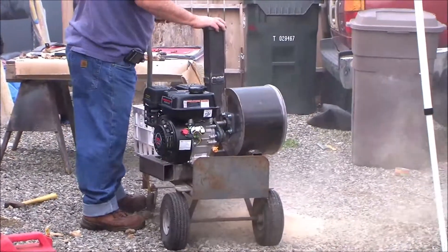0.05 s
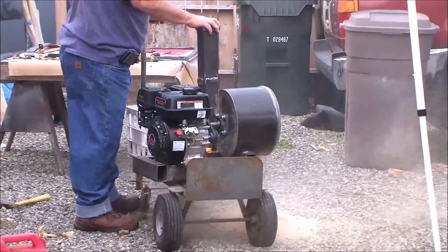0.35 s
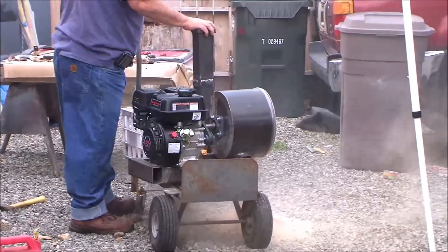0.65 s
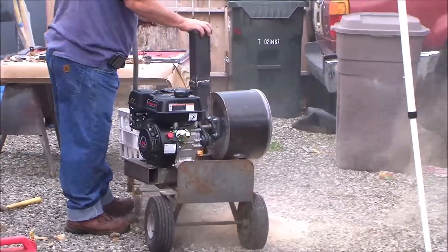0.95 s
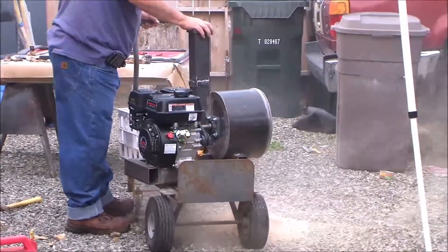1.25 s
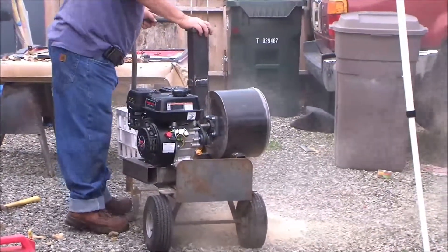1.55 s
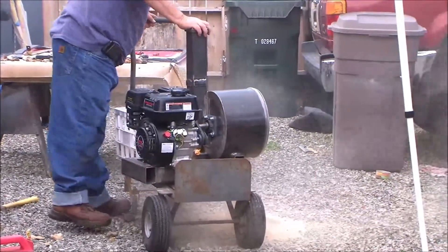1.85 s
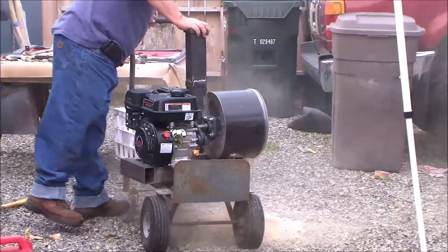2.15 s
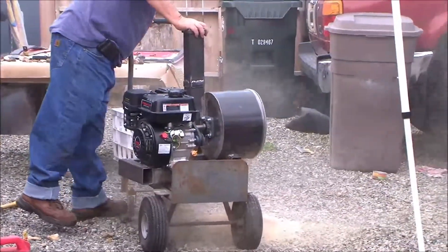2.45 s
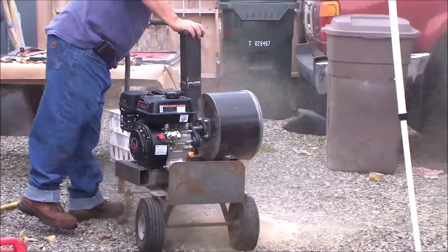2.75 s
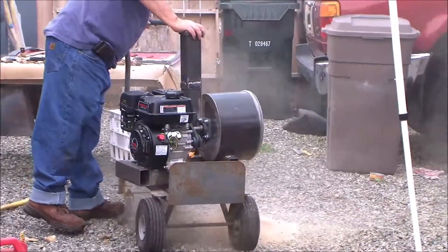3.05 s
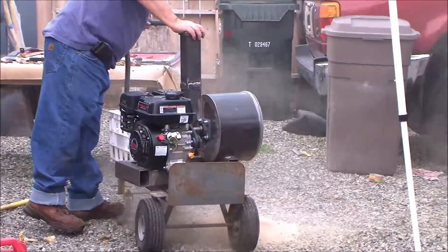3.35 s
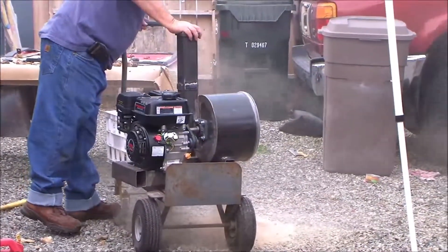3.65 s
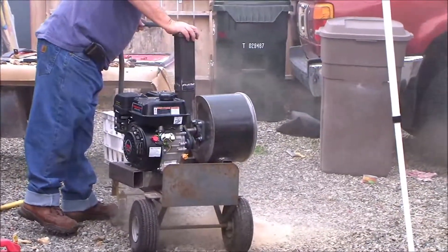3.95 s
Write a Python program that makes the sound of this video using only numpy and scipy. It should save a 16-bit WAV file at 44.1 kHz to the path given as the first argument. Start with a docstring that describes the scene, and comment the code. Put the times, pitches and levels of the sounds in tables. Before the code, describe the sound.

Rock clatters and cracks inside a steel crusher drum, then gives way to puttering engine noise.

```python
"""A gravel yard with a small flail rock crusher, driven by a one-cylinder four-stroke engine.
Three flails fling rock round a ringing steel drum; stones split and burst into hissing grit.
At about 2.7 s the drum runs empty: dust is swept round, a last pebble is knocked about
once a turn, and the engine's exhaust putter and mechanical clatter come forward."""
import sys
import numpy as np
from scipy import signal
from scipy.fft import rfft, irfft
from scipy.io import wavfile
from scipy.ndimage import uniform_filter1d

SR = 44100
rng = np.random.default_rng(int(sys.argv[2]) if len(sys.argv) > 2 else 0)


def store_pcm(level_fs):
    """Save levels as 16-bit WAV."""
    pcm = np.round(np.clip(level_fs, -1, 1) * 32767).astype(np.int16)
    wavfile.write(sys.argv[1], SR, np.atleast_2d(pcm).T)


N = 176400
RING_SAMPLES = 11025


def undb(db):
    """Decibels to gain."""
    return 10 ** (np.asarray(db) / 20)


def unit(x):
    """Scale to rms 1."""
    return x / np.sqrt(np.mean(x ** 2))


def curve(rows):
    """Interpolate (time_s, value) rows per sample."""
    time_s, values = np.array(rows).T
    return np.interp(np.arange(N) / SR, time_s, values)


def spectrum(points, hz):
    """Gain at hz from (freq_hz, gain_db) points."""
    freq_hz, gain_db = np.array(points).T
    return undb(np.interp(np.log(hz + 1), np.log(freq_hz), gain_db))


def colour(x, points, size=8192):
    """Minimum-phase filter through (freq_hz, gain_db) points."""
    cepstrum = irfft(np.log(spectrum(points, np.fft.rfftfreq(size, 1 / SR))))
    cepstrum[1:size // 2] *= 2
    cepstrum[size // 2 + 1:] = 0
    response = irfft(np.exp(rfft(cepstrum)))
    return signal.fftconvolve(x, response[None], axes=-1)[:, :x.shape[-1]]


def cut(x, hz, kind, order=2):
    """Butterworth low-pass or high-pass."""
    return signal.sosfilt(signal.butter(order, hz, kind, fs=SR, output="sos"), x)


def excite(force, response):
    """Drive a mid/side response with an impact train."""
    return signal.fftconvolve(force[None], response, axes=-1)[:, :N]


def fade(t60_s):
    """Exponential decay, 60 dB in t60_s."""
    return np.exp(-np.log(1000) * np.arange(RING_SAMPLES) / SR / t60_s)


def impacts(rate_hz, spread_db, cap=3):
    """Random impacts, a few much harder than the rest."""
    hit = rng.random(N) < rate_hz / SR
    hardness = np.minimum(rng.exponential(size=N), cap)
    return hit * rng.choice([-1, 1], N) * undb(spread_db * hardness)


def even(x, size=3000):
    """Hold the running rms at 1; single hits survive."""
    return x / np.sqrt(uniform_filter1d(np.mean(x ** 2, axis=0), size) + 1e-9)


def rotor_phase(per_turn=1, rotor_hz=23.08, flail_pass_s=2.7345):
    """Phase 0-1, wrapping per_turn times a revolution."""
    return ((np.arange(N) / SR - flail_pass_s) * rotor_hz * per_turn) % 1


def spray(gate, tone):
    """Dense ticks of small particles on steel."""
    decay = fade(0.027) + 0.34 * fade(0.06)
    ticks = 0
    for _ in range(5):
        force = impacts(rate_hz=550, spread_db=5, cap=2) * gate
        ticks += excite(force, rng.standard_normal((2, RING_SAMPLES)) * decay)
    return even(colour(ticks, tone))


def drum_response(t60_s=0.16, crack_s=0.0029, spread_db=2.5, detune_hz=3.75):
    """One random spot on the steel drum: dense ringing, a crack and its own mix of modes."""
    # drum modes: freq_hz, gain_db, t60_s
    drum_modes = [(549.8, -3, .14), (622, -11.5, 0.13), (1092, -9, 0.12), (1147, -6, 0.097),
                  (1466, -6.5, 0.17), (2040, -1, .17), (2242, -6, 0.12), (2598, -5, 0.17), (2786, -4, 0.16),
                  (2929, -5.5, 0.16), (3076, -6, 0.16), (3437, -3, 0.16), (4530, -9.5, 0.11),
                  (5340, -6, 0.11), (5560, -1, 0.08)]
    # dense ringing: freq_hz, gain_db
    drum_tone = [(120, -52), (290, -12), (450, -14.5), (760, -14.5), (1080, -1), (1300, -7.5), (1700, -4.5),
                 (2100, 0), (3100, -0.5), (3700, -5), (4700, -4), (5600, -5), (6200, -13), (9000, -13),
                 (12000, -18.5)]
    t = np.arange(RING_SAMPLES) / SR
    tone = [(hz, db + spread_db * rng.standard_normal()) for hz, db in drum_tone]
    dense = unit(colour(rng.standard_normal((2, RING_SAMPLES)) * fade(t60_s), tone))
    crack = unit(colour(rng.standard_normal((2, RING_SAMPLES)) * np.exp(-t / crack_s), tone))
    modes = 0
    for hz, db, mode_t60_s in drum_modes:
        a, b, detune = rng.standard_normal((3, 2, 1))
        phase = 2 * np.pi * (hz + detune_hz * detune[0]) * t
        modes += undb(db) * fade(mode_t60_s) * (a * np.sin(phase) + b * np.cos(phase))
    return dense + undb(-12) * crack + undb(-3) * unit(modes)


def dust():
    """Dust swept round the empty drum, pulsing once a turn."""
    # dust hiss: time_s, level_db
    level = [(2.6, -38.5), (3.35, -39), (3.45, -35.5), (3.6, -36), (3.75, -38), (4, -37)]
    # dust spectrum: freq_hz, gain_db
    tone = [(800, -11), (2000, 4), (3400, -1.5), (4000, 5.5), (4700, -1), (5550, 3.5), (6200, -7.5),
            (10300, -3.5), (12000, -11.5)]
    return spray(0.37 + np.exp(-rotor_phase() / 0.37), tone) * undb(curve(level))


def engine(first_firing_s=0.012, push_s=0.00763):
    """Two muffler puffs per firing (valve opens, piston pushes); valve gear and casing clatter."""
    # engine speed: time_s, firing_hz
    speed = [(0, 29.75), (2.55, 29.83), (2.7, 30.4), (4, 30.35)]
    # exhaust putter: time_s, level_db
    exhaust_level = [(0, -41.5), (0.87, -42), (1, -43.5), (2.86, -45), (4.0, -36)]
    # exhaust pulse: freq_hz, gain_db
    exhaust_tone = [(20, -13), (30, -38), (60, -5.5), (91, -11), (121, -1), (150, 5.5), (182, -4.5),
                    (212, -1), (243, -2.5), (275, -28.5), (395, -17), (550, -21.5), (700, -13),
                    (1500, -45.5)]
    # mechanical clatter: time_s, level_db
    clatter_level = [(0, -32), (2.65, -39.5), (3.55, -34.5), (3.8, -31.5), (4, -30.5)]
    # clatter spectrum: freq_hz, gain_db
    clatter_tone = [(100, -32.5), (280, -5), (550, -3.5), (720, -8), (1090, 0), (1300, -7), (1465, 5),
                    (1650, -3.5), (3000, -6.5), (5000, -16.5), (12000, -18.5)]
    start_hz = speed[0][1]
    cycles = np.cumsum(curve(speed)) / SR - first_firing_s * start_hz
    at = np.flatnonzero(np.diff(np.floor(cycles)))
    firing, push = np.zeros((2, N))
    firing[at], push[at] = undb(1.6 * rng.standard_normal((2, len(at))))
    puffs = firing + undb(-4) * np.roll(push, int(push_s * SR))
    exhaust = unit(colour(puffs[None], exhaust_tone))[0]
    exhaust = np.array([exhaust, signal.hilbert(exhaust).imag])  # side in quadrature
    stroke = lambda phase: undb(0.5 * np.cos(2 * np.pi * (phase - 0.25)))
    period = int(SR / start_hz)
    one_cycle = rng.standard_normal((2, period)) * stroke(np.arange(period) / period)
    repeating = unit(colour(excite(firing, one_cycle), clatter_tone))
    loose = unit(colour(rng.standard_normal((2, N)) * stroke(cycles), clatter_tone))
    clatter = unit(repeating + undb(-2) * loose)
    return exhaust * undb(curve(exhaust_level)) + clatter * undb(curve(clatter_level))


def wall_ring(mode_hz=2037, t60_s=0.18):
    """Rock grinding along the wall keeps its strongest mode singing."""
    # wall mode: time_s, relative_db
    level = [(0, -31), (.3, -31), (.6, -43), (.72, -34), (.88, -35), (.94, -25), (1.04, -31), (1.25, -32),
             (1.31, -22), (1.4, -37), (1.94, -36), (2.2, -29.5), (2.7, -60)]
    phase = 2 * np.pi * (mode_hz * np.arange(RING_SAMPLES) / SR + rng.random((2, 1)))
    ring = excite(impacts(rate_hz=400, spread_db=2), np.sin(phase) * fade(t60_s))
    return even(ring, size=1500) * undb(curve(level) - 1.5)


def grit():
    """Crushed chips spray out with each turn."""
    # grit hiss: time_s, level_db
    level = [(0, -19.5), (.11, -41), (.16, -20), (.31, -21.5), (.38, -34.5), (.45, -27), (.58, -38),
             (.84, -31.5), (.92, -21.5), (1, -37), (1.06, -26), (1.24, -39), (1.34, -20), (1.45, -22),
             (1.48, -30.5), (1.55, -21), (1.66, -22), (1.74, -45), (1.96, -22), (2.07, -38.5), (2.35, -47),
             (2.39, -23), (2.49, -31.5), (2.6, -21), (2.68, -48)]
    # grit spectrum: freq_hz, gain_db
    tone = [(500, -63), (1500, -4), (3000, -9.5), (4800, -1), (5600, 1), (7000, 4.5), (8300, 1.5),
            (10000, -6), (12000, -11)]
    return spray(0.75 + np.exp(-rotor_phase() / 0.08), tone) * undb(curve(level))


def splits(burst_t60_s=0.19, tick_t60_s=0.014):
    """Stones crack into shards that tick against the steel and die away."""
    # splitting stones: start_s, relative_db
    bursts = [(.1216, -26.5), (0.1463, -18.5), (0.1977, -18), (.2798, -21.5), (.6165, -25), (.7307, -20),
              (0.936, -20), (1.2547, -22), (1.4244, -20.5), (1.518, -23), (1.6198, -19.5), (1.8507, -26.5),
              (2.118, -23.5), (2.2546, -21), (2.367, -19.5), (2.4079, -19)]
    # shard tick: freq_hz, gain_db
    tone = [(1500, -24.5), (5500, 0.5), (8500, 0.5), (12000, -8)]
    force = np.zeros(N + RING_SAMPLES)
    for start_s, db in bursts:
        shards = impacts(rate_hz=1500, spread_db=3, cap=2)[:RING_SAMPLES] * fade(burst_t60_s)
        attack_rms = np.std(shards[:RING_SAMPLES // 20])
        start = int(start_s * SR)
        force[start:start + RING_SAMPLES] += shards / attack_rms * undb(db + 0.5)
    tick = colour(rng.standard_normal((2, RING_SAMPLES)) * fade(tick_t60_s), tone)
    return excite(force, tick / np.linalg.norm(tick[0]))


def tumbling_rock(spots=10, crossover_hz=1510):
    """Three flails fling rock against many spots on the drum."""
    # rock clatter: time_s, relative_db
    clatter_level = [(0, -20), (.55, -22), (.68, -19), (.725, -27), (.76, -20), (1.15, -19.5),
                     (1.25, -23.5), (1.45, -19.5), (1.72, -21), (1.83, -30.5), (1.9, -19.5), (2.1, -22),
                     (2.52, -25.5), (2.62, -36), (2.7, -58)]
    # low thud: time_s, relative_db
    thud_level = [(0, -29.5), (.29, -25.5), (.34, -39), (.44, -24), (.5, -35), (.71, -28.5), (1.35, -28.5),
                  (1.82, -36), (1.87, -24), (1.95, -23), (1.99, -33), (2.2, -25.5), (2.31, -39),
                  (2.41, -22.5), (2.55, -53)]
    throw = 0.39 + np.exp(-rotor_phase(per_turn=3) / 0.19)
    ring = sum(excite(impacts(rate_hz=60, spread_db=3.2) * throw, drum_response()) for _ in range(spots))
    clatter = even(cut(ring, crossover_hz, "high", order=4)) * undb(curve(clatter_level) - 1.5)
    thud = even(cut(ring, crossover_hz, "low", order=4)) * undb(curve(thud_level) - 0.57)
    return clatter + thud


def blows(contact_s=0.0028, fragments_per_s=3000):
    """Single stones crunch on the drum; lighter ones skitter longer and stir less bass."""
    # blows on the drum: start_s, relative_db, lowpass_hz
    strikes = [(0.025, -8.5, 5000), (.075, -10.5, 5500), (.1491, -4, 9000), (.2828, -8, 7000),
               (0.4233, -9, 4500), (0.4977, -5, 5770), (.616, -5.5, 7000), (.6479, -5.5, 6500),
               (0.6816, -3.5, 8000), (0.7294, -2, 9000), (0.776, -4.5, 7000), (.812, -4, 5000),
               (0.895, -5, 9000), (.9345, 0.5, 6540), (.9747, -8.5, 5500), (1.056, -7.5, 7000),
               (1.283, -7.5, 7000), (1.3272, -0.5, 5000), (1.342, -5.5, 7000), (1.5923, -3.5, 7000),
               (1.612, -1.5, 8050), (1.7711, -5, 6060), (1.8108, -8, 5900), (1.8493, -3, 9000),
               (1.893, -6, 5030), (1.936, -5, 4560), (1.9699, -8, 5500), (2.0127, -6.5, 5500),
               (2.1269, -9.5, 5000), (2.166, 1, 5130), (2.2222, -7.5, 4500), (2.2533, -4, 8000),
               (2.3645, -6.5, 8000), (2.4074, -2, 7350), (2.7343, -19.5, 4500), (2.777, -20.5, 4000),
               (2.8198, -16.5, 3040), (2.843, -13.5, 2500), (2.8647, -16, 3000), (2.9088, -22, 4200),
               (2.9945, -18, 4200), (3.0376, -19, 4200), (3.1268, -18.5, 5000), (3.169, -19.5, 4700),
               (3.2087, -20.5, 4530), (3.254, -21, 6540), (3.5547, -19, 6000), (3.749, -16, 3000)]
    size = RING_SAMPLES
    crunch = np.exp(-np.arange(size) / SR / contact_s)
    out = np.zeros((2, N + size))
    for start_s, db, lowpass_hz in strikes:
        skitter = 0.19 * fade(t60_s=0.01 - 0.01 * min(db, 0))
        fragments = rng.standard_normal(size) * (rng.random(size) < fragments_per_s / SR)
        force = fragments * (crunch + skitter)
        force[0] = 1.52  # first contact
        highpass_hz = min(800 * np.exp(-0.14 * db), 1550)
        ring = cut(excite(force, drum_response())[:, :size], highpass_hz, "high")
        ring = cut(ring, lowpass_hz, "low", order=3)
        attack_rms = np.std(ring[0, :size // 20])
        start = int(start_s * SR)
        out[:, start:start + size] += ring / attack_rms * undb(db - 12.5)
    return out[:, :N]


def scene():
    """Machine straight ahead, treble scattered wide off the yard; mid/side to left/right."""
    # stereo width: freq_hz, side_minus_mid_db
    width = [(60, -12), (125, -16), (500, -14), (1000, -11.5), (2000, -9), (4000, -6), (8000, -3.5),
             (12000, 0)]
    # stereo balance: freq_hz, left_minus_right_db
    balance = [(60, -2), (250, .5), (1000, 1.5), (2200, 2), (4000, 0.5), (8000, -1.2), (12000, -1.2)]
    hz = np.fft.rfftfreq(N, 1 / SR)
    mid, side = rfft(engine() + tumbling_rock() + wall_ring() + blows() + splits() + grit() + dust())
    side *= spectrum(width, hz)
    lean = np.sqrt(spectrum(balance, hz))
    return irfft(np.array([(mid + side) * lean, (mid - side) / lean]), N)


def record(dry, ceiling=0.9, top_hz=12050):
    """Soft-clip the peaks, then low-pass steeply."""
    rounded = dry / (1 + (np.abs(dry) / ceiling) ** 6) ** (1 / 6)
    return signal.sosfilt(signal.ellip(12, 0.2, 90, top_hz, fs=SR, output="sos"), rounded)


dry = scene()
out = record(dry)
store_pcm(out)
```